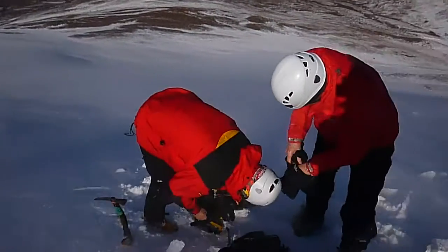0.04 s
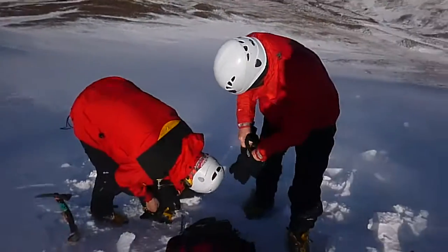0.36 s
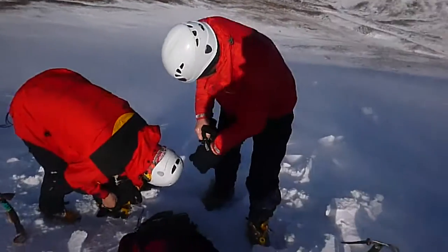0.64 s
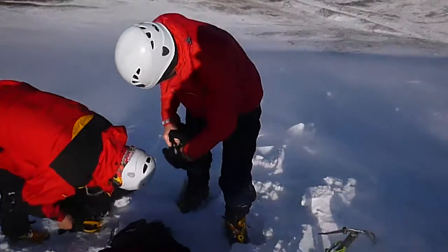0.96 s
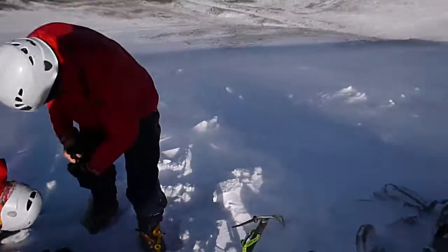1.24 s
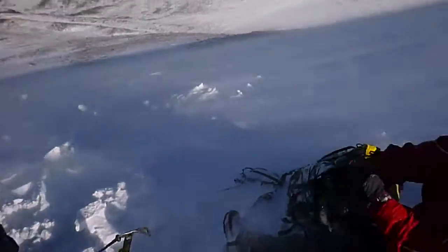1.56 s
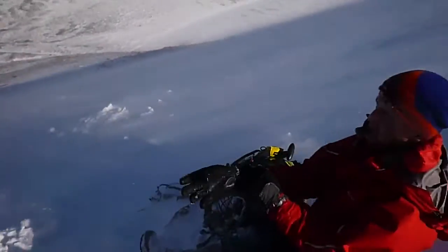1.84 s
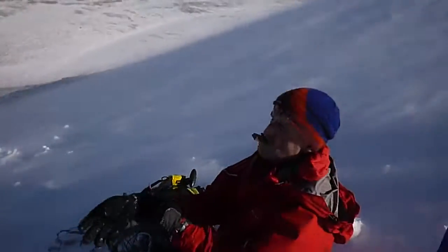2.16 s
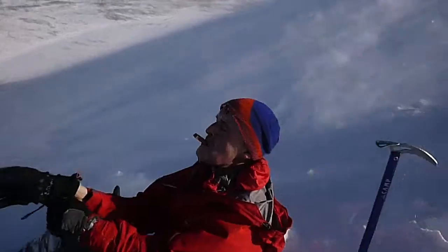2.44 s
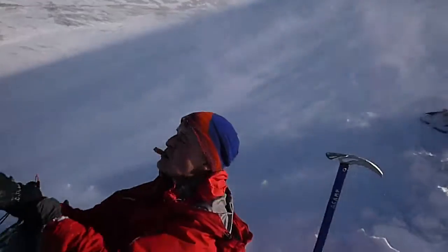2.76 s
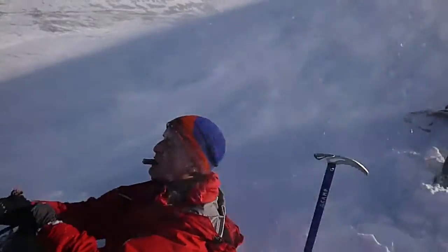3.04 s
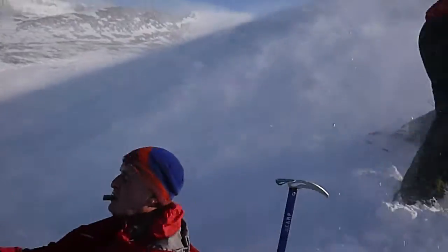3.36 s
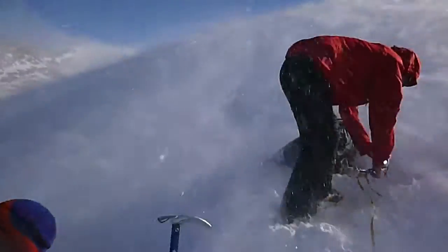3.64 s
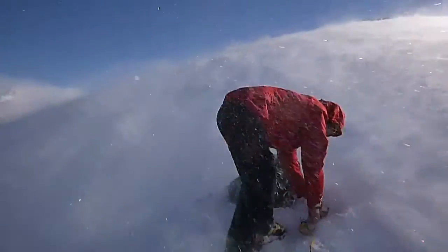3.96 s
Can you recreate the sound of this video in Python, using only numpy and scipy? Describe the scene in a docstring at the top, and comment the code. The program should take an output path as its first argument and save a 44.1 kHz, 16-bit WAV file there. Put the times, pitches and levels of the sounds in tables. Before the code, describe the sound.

Gusty wind rumbles and flaps on the microphone, then grows brighter, with faint snow ticks.

```python
"""Wind and snow at a microphone port

Wind on an open snow slope blows straight across the port of a small camera microphone.
Slow air rumbles and flaps in separate buffets; faster air sheds smaller eddies, whose pressure
fluctuates more quickly, so the rumble opens into a roar and a hiss. Blown grains of snow tick
on the housing, and the camera cuts two narrow notches into everything."""
import sys
import numpy as np
from scipy import signal
from scipy.io import wavfile

SR = 44100
rng = np.random.default_rng(int(sys.argv[2]) if len(sys.argv) > 2 else 0)


def transcribe(u):
    """Save the signal u as a 16-bit wav file named by the first command-line argument.

    u: samples, shape (n,) or (channels, n), limited to [-1, 1]; the rate is SR.
    q: integer samples, one column per channel.
    """
    v = np.clip(np.atleast_2d(u).T, -1, 1)
    q = np.round(v * 32767).astype(np.int16)
    wavfile.write(sys.argv[1], SR, q)


N = 176400


def from_db(db):
    """Amplitude grows tenfold for every 20 dB."""
    return 10 ** (np.asarray(db) / 20)


def at_hz(spectrum, hz):
    """A spectrum is interpolated on a logarithmic frequency axis."""
    frequencies, db = np.transpose(spectrum)
    return np.interp(np.log(hz), np.log(frequencies), db)


def drift(rate_hz):
    """Low-passed noise wanders smoothly, here with unit standard deviation."""
    pole = np.exp(-20 * np.pi * rate_hz / SR)   # at a tenth of the sample rate
    white = rng.standard_normal(N // 10 + 2002)
    slow = signal.lfilter([1], [1, -2 * pole, pole * pole], white)[2000:]
    return np.interp(np.arange(N) / 10, np.arange(len(slow)), slow / slow.std())


# Small difference between the two channels: (frequency [Hz], side minus mid [dB])
STEREO_WIDTH = [(100, -72), (500, -60.5), (1400, -48.5), (2800, -37), (5600, -28.5), (12000, -23)]
def noise_bands():
    """Band-pass filters divide white noise of unit power per hertz into (centre, stereo band) pairs."""
    edges = np.geomspace(75, 16500, 23) - 55
    white = rng.standard_normal((2, 2, N)) * np.sqrt(SR / 2)
    for k, (low, high) in enumerate(zip(edges, edges[1:])):
        band_pass = signal.butter(3, [low, high], "band", fs=SR, output="sos")
        mid, side = signal.sosfilt(band_pass, white[k % 2])   # adjacent bands are independent
        hz = np.sqrt(low * high)
        yield hz, mid + from_db(at_hz(STEREO_WIDTH, hz)) * np.array([side, -side])


# Faint hiss under the wind: (frequency [Hz], relative level [dB])
HISS_SPECTRUM = [(500, -101), (2000, -106), (5000, -112), (10000, -121), (15000, -122)]
def hiss_gain(hz):
    """Stationary noise keeps a constant mean amplitude in each band."""
    return from_db(at_hz(HISS_SPECTRUM, hz) - 4.5)


# Treble fizz of the hardest gusts: (time [s], spectral density [dB])
FIZZ_LEVELS = [(0, -132), (.58, -130), (.65, -120), (.8, -117), (.85, -132), (1.69, -130), (1.73, -116),
               (2.0, -122), (2.23, -115), (2.36, -132), (2.64, -126), (2.7, -111), (2.92, -109),
               (3.0, -123), (3.12, -122), (3.16, -111), (3.35, -104), (3.56, -110), (3.6, -119),
               (3.72, -118), (3.77, -110), (3.88, -114), (3.92, -123)]
def fizz_gain(t):
    """Random amplitude modulation makes the fizz flicker."""
    flicker_db = 2.5 * drift(rate_hz=52)
    return from_db(np.interp(t, *np.transpose(FIZZ_LEVELS)) + flicker_db)


# Larger grains of snow striking the housing: (time [s], relative level [dB])
LARGE_GRAINS = [(.171, -31.5), (0.292, -34), (0.2944, -25.5), (0.296, -36), (.307, -23), (.505, -38),
                (0.605, -25.5), (0.621, -27), (.968, -40), (1.165, -33), (1.283, -30.5), (1.458, -34),
                (1.875, -25.5), (3.937, -28.5)]
GRAINS_PER_S, GRAIN_DB, GRAIN_SPREAD_DB = 45, -59, 6   # fine spindrift
TICK_CORNER_HZ, TICK_GAIN_DB = 1700, 8.5
def snow():
    """An impact on a heavily damped housing is a low-passed impulse: a dead tick."""
    sizes = from_db(GRAIN_DB + GRAIN_SPREAD_DB * np.minimum(rng.exponential(1, N), 4))
    arrivals = rng.random(N) < GRAINS_PER_S / SR
    impulses = sizes * arrivals + 1e-18
    for when, db in LARGE_GRAINS:
        impulses[int(when * SR)] += from_db(db)
    damping = signal.butter(1, TICK_CORNER_HZ, fs=SR)
    return from_db(TICK_GAIN_DB) * signal.lfilter(*damping, impulses)


# Single large eddies at the port: (time [s], frequency [Hz], envelope peak [dB])
LARGE_EDDIES = [(0.351, 209, -24), (0.453, 97, -28.5), (0.491, 115, -29), (0.535, 146, -29),
                (.725, 96, -46), (.93, 140, -26.5), (1.203, 150, -29.5), (1.278, 90, -42),
                (1.321, 109, -31.5), (1.909, 225, -22), (3.819, 57.4, -32)]
THUMP_HALF_CYCLES = 0.91   # half length of the envelope, in periods
def thumps():
    """A passing eddy is a wave packet: a rounded swing of pressure a few cycles long."""
    t, out = np.arange(N) / SR, np.zeros(N)
    for (when, hz, db), phase in zip(LARGE_EDDIES, rng.random(len(LARGE_EDDIES))):
        cycles = (t - when) * hz
        envelope = from_db(db) * np.exp(-(cycles / THUMP_HALF_CYCLES) ** 2)
        out += envelope * np.sin(2 * np.pi * (cycles + phase))
    return out


# Gusts at the port: (time [s], relative eddy level [dB], corner frequency [Hz])
GUSTS = [(0.0, -65.5, 400), (0.05, -69, 208), (0.098, -62.5, 570), (0.26, -68, 594), (0.36, -61.5, 390),
         (0.39, -71, 410), (0.47, -71, 460), (0.575, -66, 454), (0.606, -63, 1340), (0.812, -59.5, 1380),
         (0.838, -66, 706), (0.949, -64, 1010), (0.995, -74, 534), (1.09, -70, 365), (1.169, -65, 650),
         (1.24, -73.5, 264), (1.31, -70, 397), (1.56, -70.5, 470), (1.692, -67, 607), (1.781, -59.5, 1950),
         (1.9, -60.5, 1750), (2.1, -61, 1290), (2.18, -64, 2340), (2.28, -65.5, 2690), (2.37, -74, 1330),
         (2.47, -67.5, 2150), (2.59, -61.5, 2120), (2.65, -65.5, 2170), (2.698, -62, 4200),
         (2.9, -63.5, 5500), (2.992, -70, 1910), (3.04, -68.5, 2550), (3.11, -67, 2040),
         (3.16, -70.5, 3270), (3.22, -67.5, 3120), (3.32, -63, 4000), (3.565, -65, 3120),
         (3.59, -64.5, 1710), (3.72, -69.5, 1910), (3.768, -62.5, 2390), (3.88, -66, 2650),
         (3.92, -70, 1740), (4.0, -69, 1700)]
# Short buffets: (time [s], half length [s], level rise [dB], corner shift [octaves])
SHORT_BUFFETS = [(0.127, 0.03, 1.5, -0.4), (.23, 0.066, 2, -0.1), (0.344, 0.019, 4.5, 1.07),
                 (.452, 0.011, 5.5, 1.5), (0.801, 0.014, 0, 0.32), (1.028, .013, 9.5, 2.5),
                 (1.131, 0.01, 6.5, 1.63), (1.207, 0.012, 12, 0.9), (1.269, 0.013, 13.5, 2),
                 (1.333, 0.023, 5, 0), (1.388, .012, 7, 2.0), (1.444, 0.017, 6.5, 1),
                 (1.499, 0.016, 8.5, 1.5), (1.608, .011, 9, 0.66), (1.642, 0.012, 5.5, 0.96),
                 (1.723, 0.0089, 6, 1.4), (2.04, 0.011, 1, .8), (2.232, 0.0089, 7.5, -0.5),
                 (2.329, 0.014, 4, .7), (2.397, 0.017, 10.5, 0.0), (2.946, 0.0095, 3.5, 1),
                 (3.038, 0.0061, 8, 0.7), (3.152, 0.0095, 5.5, .5), (3.561, 0.0044, 3, 0.34)]
SLOW_WIND_HZ, STEADYING = 666, 0.47   # above this corner, flutter shrinks by this power law
FLUTTER_DB, FLUTTER_OCTAVES, TEARING_OCTAVES = 2.5, 0.18, 0.49
def airflow(t):
    """Faster air sheds smaller eddies, so the corner of their spectrum rises with wind speed."""
    times, db, hz = np.transpose(GUSTS)
    level_db, octave = np.interp(t, times, db), np.interp(t, times, np.log2(hz))
    unsteadiness = (SLOW_WIND_HZ / np.maximum(2 ** octave, SLOW_WIND_HZ)) ** STEADYING
    for when, half_length, rise_db, shift_octaves in SHORT_BUFFETS:
        swell = np.exp(-((t - when) / half_length) ** 2)
        level_db += rise_db * swell
        octave += shift_octaves * swell
    flutter = unsteadiness * drift(rate_hz=64)
    tearing = unsteadiness * drift(rate_hz=252)   # brightness flicks as flow tears off the edge
    corner_hz = 2 ** (octave + FLUTTER_OCTAVES * flutter + TEARING_OCTAVES * tearing)
    return level_db + FLUTTER_DB * flutter, corner_hz


TREBLE_DB_PER_OCTAVE, KNEE_SHARPNESS = 15, 2.015
BASS_DB_PER_OCTAVE, LARGEST_EDDY = 0.5, 0.078   # the bass thins below this fraction of the corner
def turbulence_db(hz, corner_hz):
    """Eddy pressure follows power laws: steep above the corner, shallow below the largest eddy."""
    treble_octaves = np.log2(1 + (hz / corner_hz) ** KNEE_SHARPNESS) / KNEE_SHARPNESS
    bass_octaves = np.log2(1 + (LARGEST_EDDY * corner_hz / hz) ** 2) / 2
    return -TREBLE_DB_PER_OCTAVE * treble_octaves - BASS_DB_PER_OCTAVE * bass_octaves


RASP_HZ, RASP_HALF_OCTAVES, RASP_DB = 1370, 0.55, 3.5
def rasp_db(hz, corner_hz):
    """Slow air rasps in the port: a broad spectral peak that fades as the flow quickens."""
    slowness = 1 / (1 + (corner_hz / RASP_HZ) ** 2)
    return RASP_DB * slowness * np.exp(-(np.log2(hz / RASP_HZ) / RASP_HALF_OCTAVES) ** 2)


# Response of the port to eddies: (frequency [Hz], gain [dB])
PORT_RESPONSE = [(20, -3), (40, -1.5), (70, 4), (130, 4.5), (220, 2), (450, -2.5), (900, -6), (1450, -8.5),
                 (2300, -10), (3600, -9), (5200, -12), (7300, -17), (10000, -23.5), (14000, -34)]
# Deep bass against the rest: (time [s], shelf gain [dB])
BASS_SHELF = [(0, 2), (.5, 5), (.9, 1.5), (1.3, 1.5), (1.8, -2.5), (2.2, -5.5), (2.55, -24), (2.85, 1),
              (3.1, 4), (3.5, -3.5), (3.8, 5), (4.0, -4)]
BASS_BELOW_HZ, FIZZ_ABOVE_HZ = 60, 5000
EDDY_GAIN_DB, PATCHY_DB = -0.84, 1.0
def wind():
    """The port filters the eddy pressure; eddies, hiss and fizz are incoherent and add in power."""
    t, out = np.arange(N) / SR, np.zeros((2, N))
    level_db, corner_hz = airflow(t)
    bass_db = np.interp(t, *np.transpose(BASS_SHELF))
    fizz = fizz_gain(t)
    for hz, noise in noise_bands():
        flow_db = level_db + turbulence_db(hz, corner_hz) + PATCHY_DB * drift(rate_hz=24)
        port_db = at_hz(PORT_RESPONSE, hz) + rasp_db(hz, corner_hz)
        shelf_db = bass_db / (1 + (hz / BASS_BELOW_HZ) ** 2)
        eddies = from_db(EDDY_GAIN_DB + flow_db + port_db + shelf_db)
        background = np.hypot(hiss_gain(hz), fizz * min(1, hz / FIZZ_ABOVE_HZ))
        out += noise * np.hypot(eddies, background)
    return out


def scene():
    """The pressures of wind and blown snow superpose right at the microphone."""
    return wind() + thumps() + snow()


# Narrow stop bands of the camera: (frequency [Hz], bandwidth [Hz])
CAMERA_NOTCHES = [(1912, 170), (2402, 170)]
CUTOFF_HZ = 15500
def record(dry):
    """The camera acts as a linear filter: two notches and a steep low-pass."""
    for hz, width_hz in CAMERA_NOTCHES:
        dry = signal.lfilter(*signal.iirnotch(hz, hz / width_hz, fs=SR), dry)
    low_pass = signal.ellip(12, .1, 80, CUTOFF_HZ, fs=SR, output="sos")
    return signal.sosfilt(low_pass, dry)


dry = scene()
out = record(dry)
transcribe(out)
```